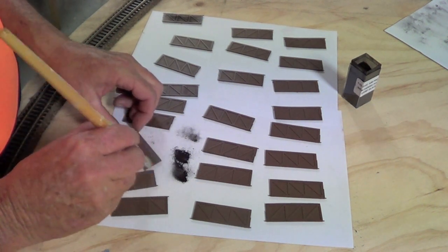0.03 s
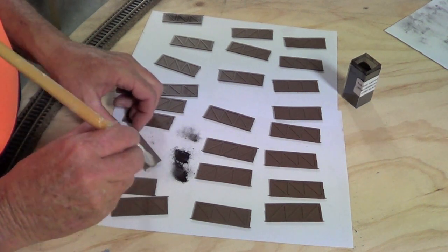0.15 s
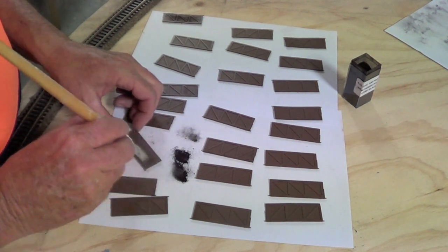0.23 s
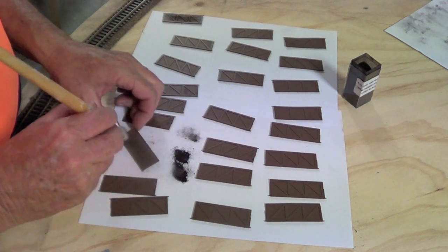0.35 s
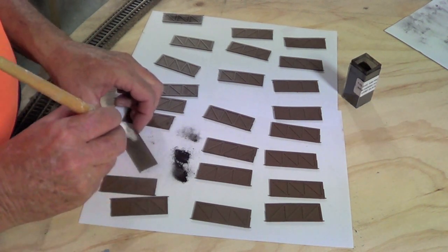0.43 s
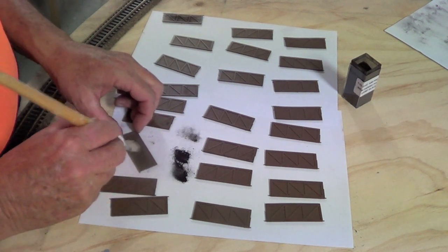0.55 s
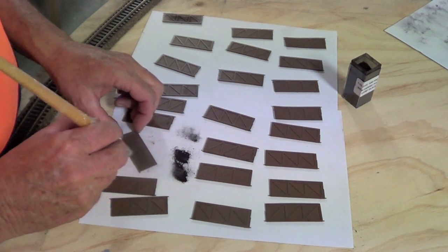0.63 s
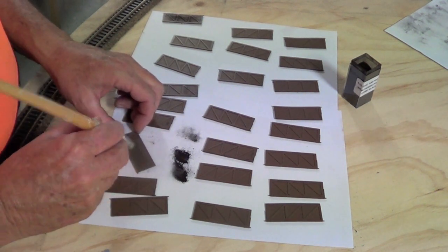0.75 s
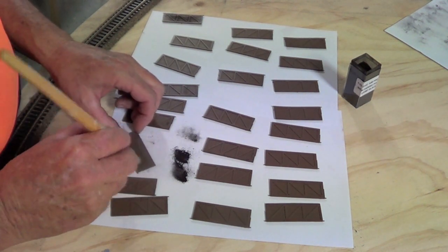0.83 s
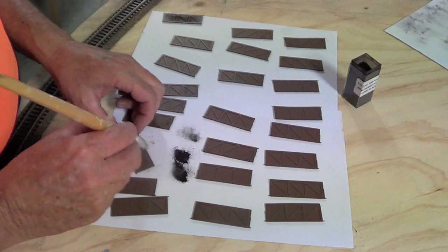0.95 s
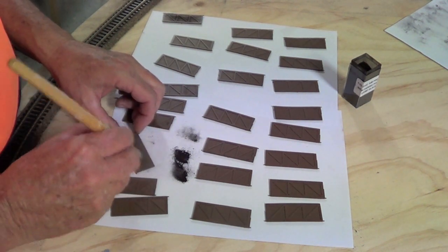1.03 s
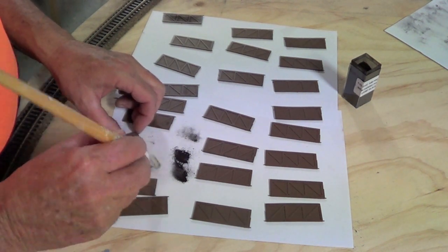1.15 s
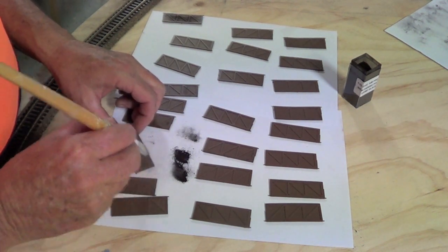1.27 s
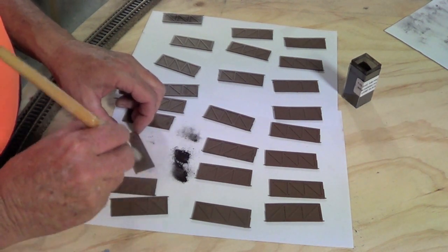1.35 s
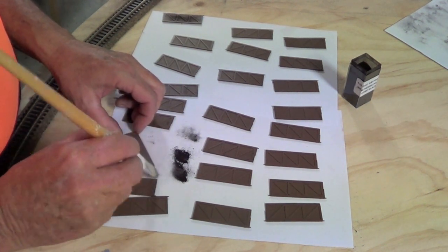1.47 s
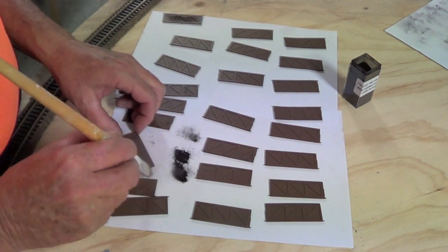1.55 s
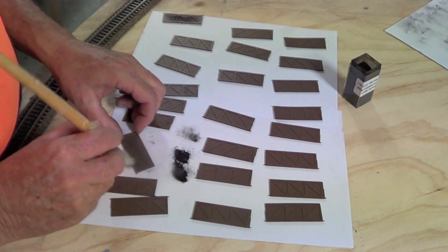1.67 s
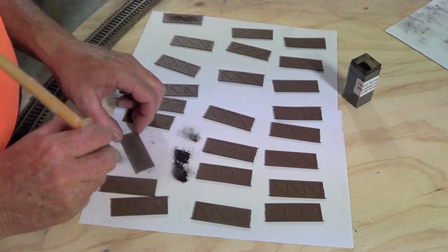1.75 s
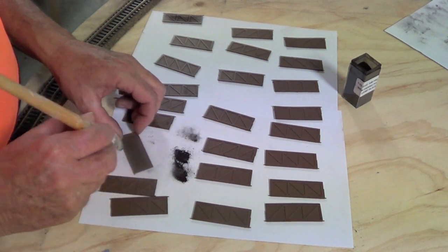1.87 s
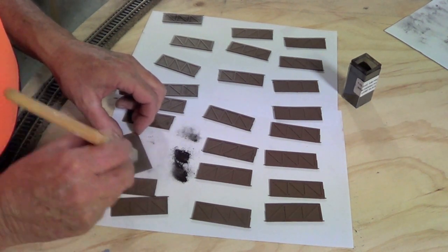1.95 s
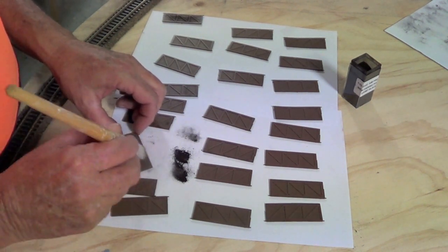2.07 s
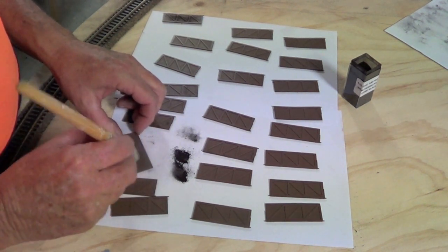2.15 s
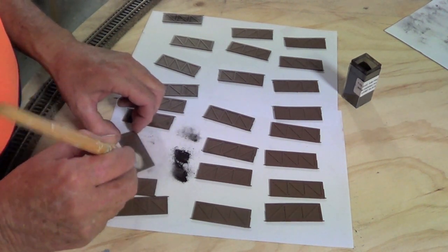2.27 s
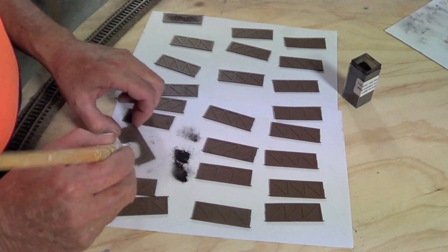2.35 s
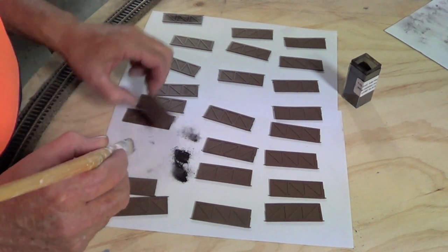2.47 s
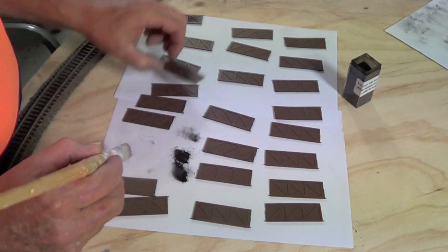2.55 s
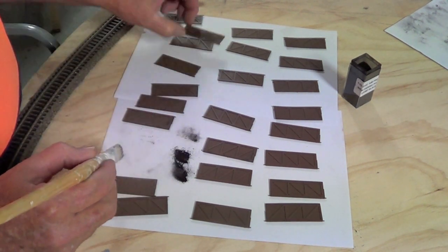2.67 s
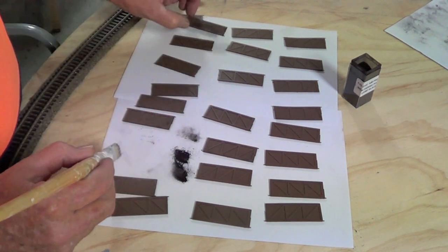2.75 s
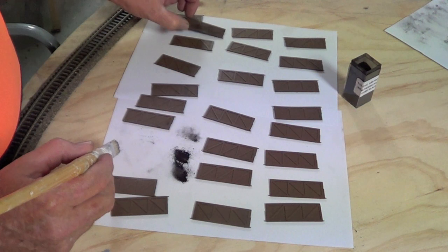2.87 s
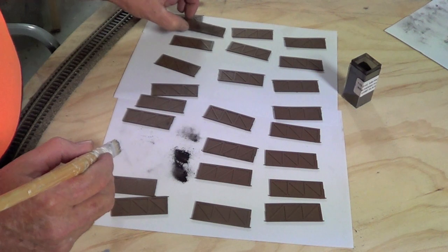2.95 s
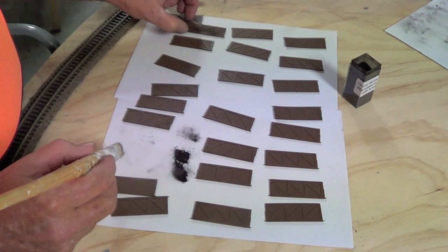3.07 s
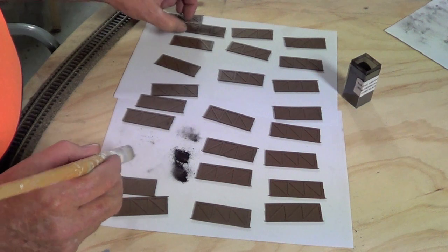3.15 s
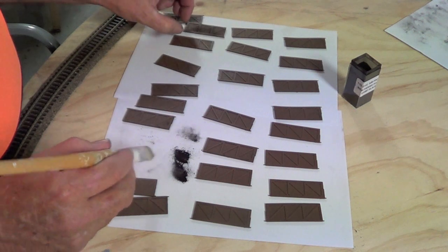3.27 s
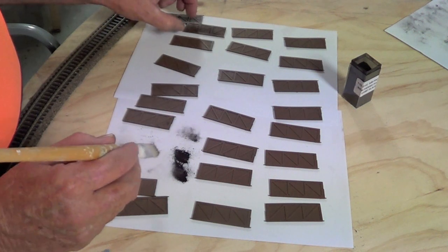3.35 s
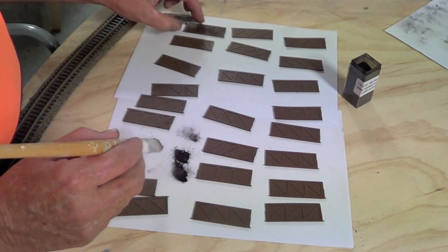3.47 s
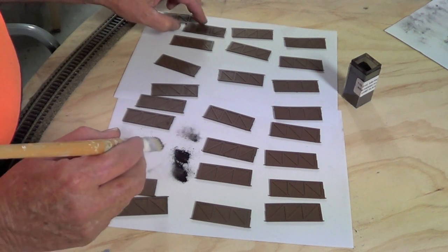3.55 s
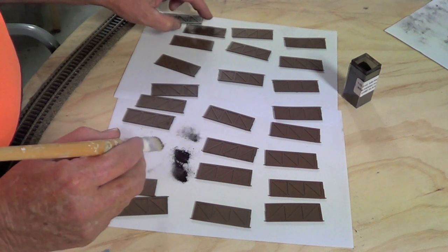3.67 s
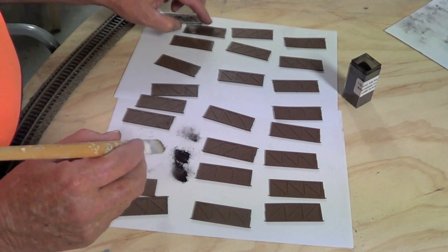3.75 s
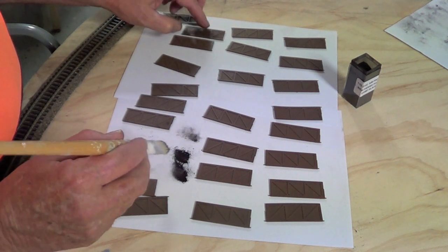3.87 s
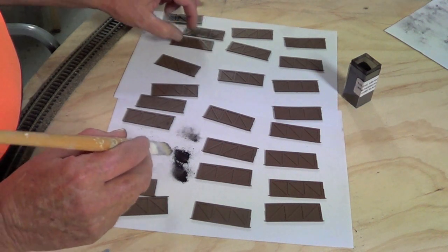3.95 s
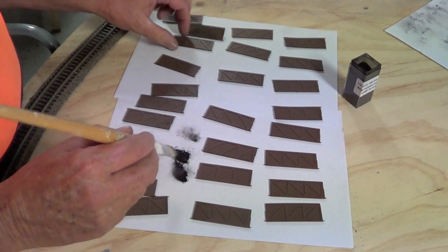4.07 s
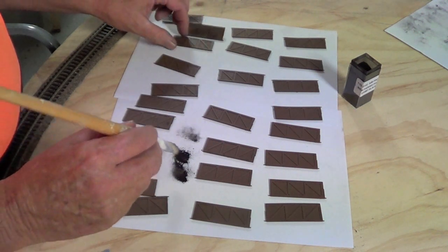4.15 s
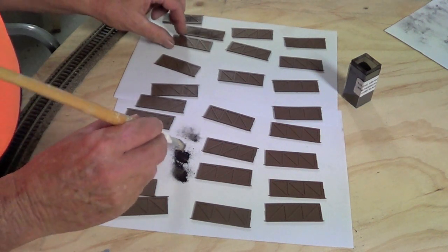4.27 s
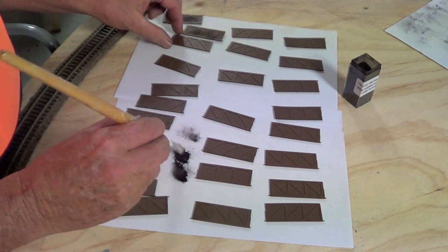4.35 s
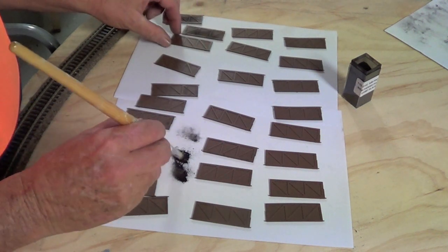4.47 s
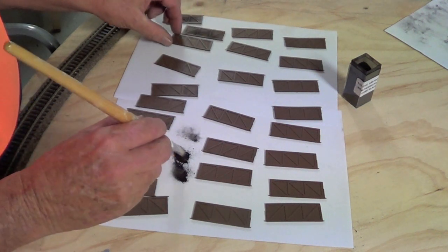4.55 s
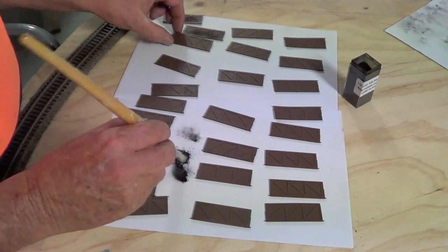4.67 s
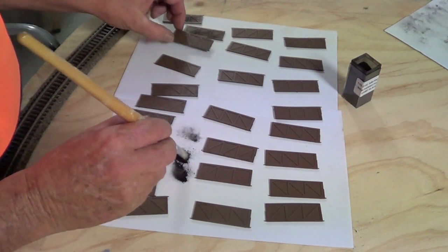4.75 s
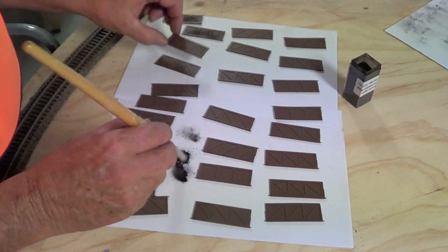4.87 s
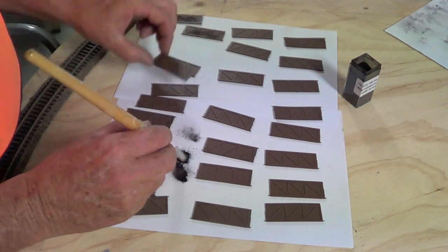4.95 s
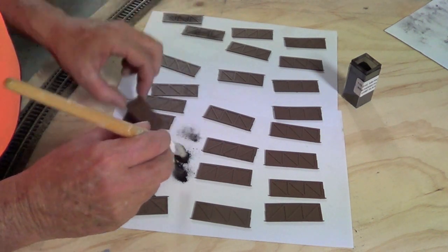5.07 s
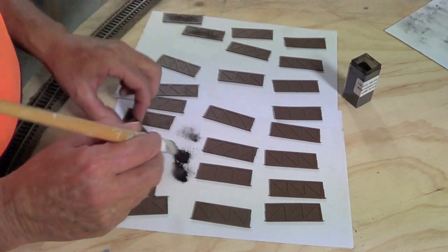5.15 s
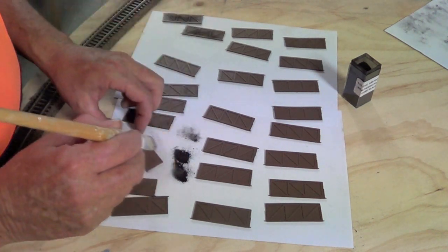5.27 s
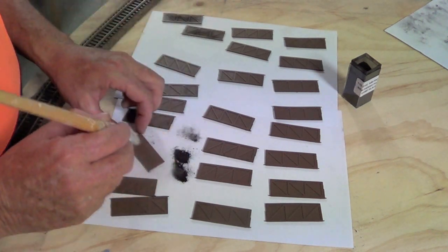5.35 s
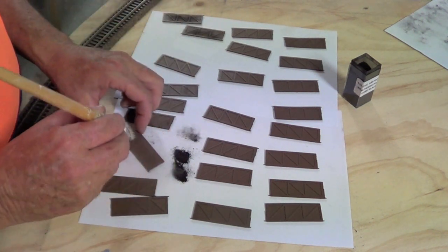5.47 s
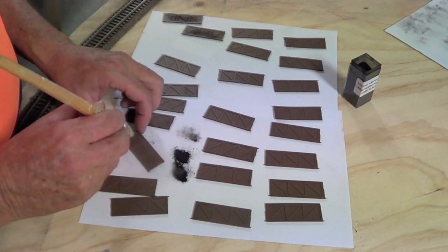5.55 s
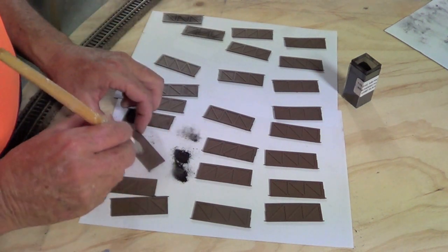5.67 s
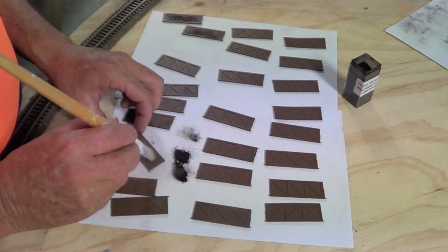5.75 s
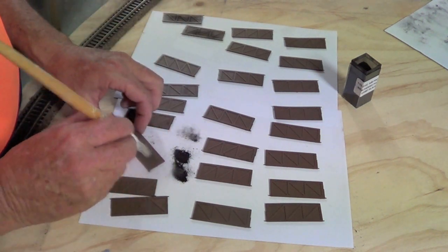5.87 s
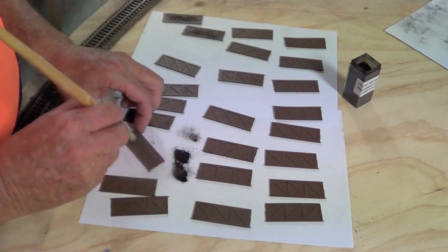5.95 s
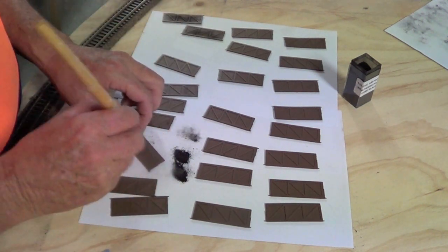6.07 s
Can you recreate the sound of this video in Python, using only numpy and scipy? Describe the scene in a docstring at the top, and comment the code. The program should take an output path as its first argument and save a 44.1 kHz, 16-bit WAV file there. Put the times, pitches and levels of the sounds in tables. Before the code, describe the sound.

A small stiff brush scrubs plastic tiles in short bright strokes, a tile clatters down, then light paper dabs and bench knocks over soft hum.

```python
"""A small stiff brush scrubs powder over plastic tiles on a paper-covered workbench, close to a camera's
microphone pair. Its bristles are random slips that shake short fizzes of noise, shaped into landings, pulls and dabs.
A tile clatters down and the bench is knocked: rough or rounded pushes ring decaying modes.
Behind lie the room's soft hum of slow noise and a tone, a rush of air as coloured noise, and
the camera's own motor, a treble whine of sine lines a shaft rate apart."""
import sys
import numpy as np
from scipy import signal
from scipy.fft import rfft, irfft
from scipy.io import wavfile
from scipy.ndimage import uniform_filter1d

SR = 44100
rng = np.random.default_rng(int(sys.argv[2]) if len(sys.argv) > 2 else 0)


def digitize_waveform(pressure):
    """Quantize a signal to 16-bit integers and store it at the path in sys.argv[1].

    Rows of a 2-D input are taken as channels; values are limited to [-1, 1].
    """
    field = np.atleast_2d(pressure).T
    bounded = np.clip(field, -1, 1)
    quanta = np.round(bounded * 32767).astype(np.int16)
    wavfile.write(sys.argv[1], SR, quanta)


def gain_from_decibels(decibels):
    """Convert decibel values to linear amplitude factors."""
    exponent = np.asarray(decibels, float) / 20
    return 10 ** exponent


N = 269451
T = np.arange(N) / SR

# motor housing resonances:
# (centre [Hz], half width to -6 dB [Hz], relative level [dB], odd shaft multiples re even [dB])
HOUSING_MODES = [(3350, 90, -80, 0), (3650, 120, -78, -8), (4055, 95, -65.5, -3), (4380, 230, -75, -1),
                 (4720, 120, -69, -5), (5120, 170, -75, 0), (5300, 40, -64, -8), (5428, 55, -68, 0),
                 (5850, 90, -79, 0), (8370, 70, -79, 0), (8590, 85, -70, -2), (8870, 100, -80, 0),
                 (9255, 105, -65.5, -2.5), (9460, 150, -75, -1), (10400, 90, -81, 0)]
# housing resonances struck once a shaft turn:
# (from [Hz], to [Hz], time into the turn [s], lag of the odd lines [cycles])
HOUSING_STRIKES = [(3900, 4300, .0015, .25), (5000, 6000, .0055, .15), (8300, 8950, .0128, 0),
                   (8950, 9800, .0142, .08)]
SHAFT_HZ, WHINE_DB = 50, 0.5
# bands of bass hum from distant machines: (centre [Hz], rms level [dB], width [Hz])
HUM_BANDS = [(101.1, -61, 20.6), (54.9, -63.5, 22), (162.6, -66.5, 28.4)]
TONE_HZ, TONE_DB = 285.3, -60.5
# spectrum of the air rush: (frequency [Hz], relative density [dB])
AIR_SPECTRUM = [(13, -44), (22, -10), (87, -0.5), (233, -6.5), (283, -8), (352, -12.5), (947, -9.5),
                (3170, -18), (3950, -19), (4920, -16), (5340, -15), (6300, -19.5), (9260, -18.5),
                (10100, -19), (15600, -22)]
# swell of the low part of the rush: (time [s], relative level [dB])
RUSH_SWELL = [(0, 7.5), (.5, 7), (1, 6.5), (1.5, 7.5), (2.2, 6), (3, 4.5), (4, 5.5), (5, 5.5), (6.11, 4.5)]
# stereo width of the rush: (frequency [Hz], side re mid [dB])
AIR_WIDTH = [(60, -33), (110, -24.5), (200, -14.5), (380, -4), (700, -5), (1290, -4.5), (2380, -3.5),
             (4400, 4), (8120, -13.5), (15000, -37)]
AIR_DB, RUSH_TOP_HZ, HISS_DB = -51, 2440, -76
# colour of the scrubbing bristles: (frequency [Hz], relative gain [dB])
BRISTLE_COLOUR = [(1760, -46.5), (3000, -17.5), (3640, -11), (4240, -17.5), (4800, -8.5), (5320, -1),
                  (6320, -2.5), (7200, -0.5), (8100, -9), (8920, -0.5), (10900, -2.5), (12900, -13.5),
                  (15600, -11.5)]
# the brush lands on the tile and the bristles splay:
# (time [s], length [s], relative level [dB], scrape re main [dB], sheen re main [dB])
BRUSH_LANDINGS = [(0.065, 0.014, -38.5, -0.5, -13), (0.615, 0.019, -40.5, -9, -12),
                  (0.858, 0.015, -38.5, -3, -10), (1.11, 0.016, -38.5, -6, -13),
                  (1.453, 0.0065, -35, -2.5, -12), (1.763, .022, -39.5, -6, -8),
                  (2.039, .012, -45.5, -13, -15), (2.253, 0.012, -42.5, -1, -10),
                  (5.97, 0.018, -40.5, -6.5, -12)]
# the brush is pulled along the tile and lifted:
# (start [s], lift [s], relative level at the lift [dB], swell on the way [dB], sheen re main at the lift [dB])
BRUSH_PULLS = [(0.109, .175, -38.5, 3, -7), (0.307, 0.396, -33, 11, -11), (0.64, 0.718, -44.5, 2.5, -9),
               (0.915, 0.955, -43.5, -7.5, -9), (1.143, 1.191, -38.5, 3, -4), (1.499, 1.545, -40, 0.5, -6),
               (1.793, 1.803, -42, -4, -7), (1.834, 1.842, -37, 6.5, -3), (2.074, 2.122, -46.5, -4, -7),
               (2.3, 2.332, -46, -2.5, -7), (5.749, 5.803, -39.5, 7.5, -10), (6.002, 6.058, -41, -2.5, -8)]
LAND_DB_PER_S, SPLAY_DB_PER_S = 2500., 900.  # rise and fall of a landing
GRIP_DB_PER_S, LIFT_DB_PER_S = 508, 527  # rise and fall of a pull
PULL_SCRAPE_DB, LIFT_SCRAPE_DB_PER_S = -4, 105  # the scrape outlasts the lift
PULL_SHEEN_DB_PER_S = 66  # a pull brightens on its way to the lift
SPLIT_HZ, SHEEN_HZ = 8200, 11800
FLICKER_DB = 1.3  # spread of the separate wavering of the two lower bristle bands
# bristle tufts snapping over an edge: (time [s], strength [dB], bright part re dark part [dB])
TUFT_SNAPS = [(0.0726, -33, -15), (0.2823, -46, 3), (0.3057, -40, 9), (0.3414, -41, -4), (0.3495, -31, 3),
              (0.3535, -36, -6), (0.362, -36, 0), (0.366, -39, -3), (0.382, -31, -7), (0.3935, -30, -2),
              (0.4054, -35, -3), (0.6367, -33, 7), (1.1824, -32, 1), (1.4975, -32, -5), (1.544, -38, 4),
              (1.7714, -40, 9), (2.037, -41, 5), (2.0771, -32, -11), (2.0847, -34, 6), (2.255, -36, -10),
              (2.268, -34, -7), (3.5154, -44, -12), (3.5967, -41, -15), (3.6575, -42, 3), (3.6717, -44, 0),
              (3.7289, -45, 0), (4.136, -39, 2), (4.4967, -40, 1), (4.7711, -44, 3), (4.9811, -36, 3),
              (5.9688, -40, -5)]
FIZZ_DECAY_S = 0.0011  # shared by snaps and ticks
# light touches and slides on the paper:
# (start [s], end [s], relative level at the end [dB], swell on the way [dB])
PAPER_DABS = [(2.965, 2.985, -58.5, 3), (3.01, 3.03, -62, -4), (3.67, 3.71, -65, -8),
              (3.873, 3.925, -59.5, -6.5), (4.13, 4.2, -62.5, -5), (4.314, 4.43, -61.5, -5),
              (4.47, 4.507, -50.5, 8), (4.547, 4.624, -61.5, -14), (4.769, 4.77, -44.5, 11),
              (4.79, 4.833, -60, 6), (4.986, 4.987, -43, 4), (5.034, 5.053, -54, -3),
              (5.343, 5.352, -57.5, 0)]
TOUCH_DB_PER_S, LEAVE_DB_PER_S = 900., 600.  # rise and fall of a dab
DAB_SHEEN_DB, DAB_SCRAPE_DB = -9, -2
# the tile lands, bounces and rattles to rest: (time [s], strength [dB], contact decay [s])
TILE_BLOWS = [(3.1375, -43, .001), (3.1456, -22.5, 0.0015), (3.1505, -22, 0.0041), (3.153, -18.5, 0.0025),
              (3.1605, -25.5, 0.002), (3.166, -23, 0.045), (3.182, -38, 0.0055)]
# modes of the small tile: (frequency [Hz], relative level [dB], t60 [s])
TILE_MODES = [(3554, -5, 0.019), (4980, -6, .01), (5330, -7, 0.022), (6400, -4, .012), (6790, -7, 0.036),
              (7180, -8, .015), (8780, -2, 0.0079), (9940, 2.5, 0.011), (10450, -3.5, .006),
              (11200, -6, .01), (13400, -4, .005), (14800, -10, .004)]
# knocks on the bench top: (time [s], push strength [dB], contact [s], tick strength [dB])
BENCH_KNOCKS = [(4.135, -41, 0.0012, -60), (4.3139, -32, 0.00052, -17.5), (4.5389, -30.5, 0.00011, -20)]
# modes of the bench top: (frequency [Hz], relative level [dB], t60 [s])
BENCH_MODES = [(349, 1.5, 0.07), (407, 11, 0.016), (499, -3.5, 0.087), (642, 3, 0.024), (803, 7, 0.022),
               (910, 5, 0.016), (1040, 0.5, 0.028), (1180, 4.5, 0.021), (1560, 3, 0.011), (1677, -1, 0.033),
               (2080, 0.5, 0.008), (2940, -8, 0.0048)]
REBOUND_S, REBOUND_DB = .009, -14.5
# stereo width of the room tail: (frequency [Hz], side filter gain [dB])
ROOM_WIDTH = [(200, -20), (800, -12), (3000, -8), (6000, -50), (12000, -50)]
ROOM_T60_S, ROOM_TREBLE_T60_S, ROOM_SPLIT_HZ = 0.61, 0.41, 1560
TOP_HZ = 15900


def level(x, db):
    """Scale to an rms level."""
    return x * gain_from_decibels(db) / np.sqrt(np.mean(x ** 2))


def along(points, hz):
    """Read (frequency [Hz], value) points on a log-frequency axis."""
    f, v = np.transpose(points)
    return np.interp(np.log(hz + 1), np.log(f), v)


def colour(x, points):
    """Causal filter with the given (frequency [Hz], gain [dB]), from the cepstrum."""
    cepstrum = irfft(np.log(gain_from_decibels(along(points, np.arange(1025) * SR / 2048))))
    # folding onto positive times gives minimum phase
    cepstrum[1:1024] *= 2
    cepstrum[1025:] = 0
    response = irfft(np.exp(rfft(cepstrum)))
    return signal.fftconvolve(x, response)[:N]


def band(x, lo_hz, hi_hz):
    """Steep band-pass."""
    sos = signal.butter(3, [lo_hz, min(hi_hz, .45 * SR)], "band", fs=SR, output="sos")
    return signal.sosfilt(sos, x)


def walk(rate):
    """Random levels held 1 / rate s and slewed twice; spread 1."""
    k = int(SR / rate)
    held = np.repeat(rng.standard_normal(N // k + 1), k)
    w = uniform_filter1d(uniform_filter1d(held, k), k)[:N]
    return w / w.std()


def crackle(per_s, spread_db, smear_s, hiss):
    """Bristle tips slip one by one with uneven force; each slip fizzes briefly, over a smooth hiss."""
    chance = rng.random((2, N))
    strength = gain_from_decibels(-spread_db * np.log(chance[1] + .02))
    slips = (chance[0] < per_s / SR) * strength
    force = signal.lfilter([1], [1, -np.exp(-1 / (smear_s * SR))], slips)
    return rng.standard_normal(N) * (hiss + force / np.sqrt(np.mean(force ** 2)))


def contact(start_s, end_s, db, swell_db, rise_db_per_s, fall_db_per_s):
    """Level in dB of one contact: a rise, a steady swell while it lasts, a fall."""
    held = db - swell_db * np.clip((end_s - T) / (end_s - start_s), 0, 1)
    rise = rise_db_per_s * np.maximum(start_s - T, 0)
    fall = fall_db_per_s * np.maximum(T - end_s, 0)
    return held - rise - fall


def bursts(events):
    """A fizz of a few milliseconds at each (time [s], peak [dB])."""
    x = np.zeros(N)
    t = T[:int(.015 * SR)]
    for (s, db), noise in zip(events, rng.standard_normal((len(events), len(t)))):
        burst = noise * (1 - np.exp(-t / .00015)) * np.exp(-t / FIZZ_DECAY_S)
        x[int(s * SR):int(s * SR) + len(t)] += gain_from_decibels(db) * burst / np.abs(burst).max()
    return x


def blows(events):
    """A rough push at each time that dies away over the contact time; longer ones are weaker at each instant."""
    x = np.zeros(N)
    t = T[:SR // 4]
    for (s, db, contact_s), noise in zip(events, rng.standard_normal((len(events), len(t)))):
        push = noise * np.exp(-t / contact_s)
        x[int(s * SR):int(s * SR) + len(t)] += gain_from_decibels(db) * push / np.sqrt(contact_s * SR / 2)
    return x


def ring(x, modes):
    """Decaying modes of a struck body."""
    t = T[:SR // 2]
    body = np.zeros(len(t))
    for k, (hz, db, t60) in enumerate(modes):
        # neighbouring modes start in opposite sense, so the body is quiet below its lowest one
        body += (-1) ** k * gain_from_decibels(db) * np.sin(2 * np.pi * hz * t) * 1000. ** (-t / t60)
    return signal.fftconvolve(x, body / np.abs(body).max())[:N]


def whine():
    """The motor repeats one pattern every shaft turn, so its housing sings in lines a shaft rate apart."""
    k = np.arange(60, 215)
    lines = k * SHAFT_HZ
    power = np.zeros(len(k))
    for hz, half_hz, db, odd_db in HOUSING_MODES:
        power += gain_from_decibels(db + odd_db * (k % 2) - 6 * ((lines - hz) / half_hz) ** 2) ** 2
    x = np.zeros(N)
    for hz, gain, chance in zip(lines, np.sqrt(power), rng.random(len(k))):
        if gain < gain_from_decibels(-88):
            continue
        turns = chance
        for lo, hi, s, lag in HOUSING_STRIKES:
            if lo <= hz < hi:
                # lines of a struck resonance add up to a burst a turn; lagging odd lines split it in two
                turns = .2 * chance - hz * s - lag * (hz // SHAFT_HZ % 2)
        x += gain * np.sin(2 * np.pi * (hz * T + turns))
    return np.sqrt(2) * gain_from_decibels(WHINE_DB) * x


def hum():
    """Distant machines: one nearly steady tone and broad wavering bands of noise in the bass."""
    phase = 2 * np.pi * np.cumsum(TONE_HZ + 0.47 * walk(5.42)) / SR
    x = level(np.sin(phase) * gain_from_decibels(1.8 * walk(4.4)), TONE_DB)
    for hz, db, width_hz in HUM_BANDS:
        noise = rng.standard_normal(N)
        x = x + level(band(noise, hz - width_hz / 2, hz + width_hz / 2), db)
    return x


def air():
    """Ventilation rush: coloured noise that swells in its low part, steady above, widest in the middle range."""
    hz = np.arange(N // 2 + 1) * SR / N
    mid, side = rfft(rng.standard_normal((2, N))) * gain_from_decibels(along(AIR_SPECTRUM, hz))
    side = side * gain_from_decibels(along(AIR_WIDTH, hz))
    both = np.array([mid + side, mid - side])
    low = 1 / (1 + (hz / RUSH_TOP_HZ) ** 4)
    swell = gain_from_decibels(np.interp(T, *np.transpose(RUSH_SWELL)) + .5 * walk(2.08))
    rush = irfft(both * low, N) * swell
    steady = irfft(both * (1 - low), N)
    return level(rush + steady, AIR_DB)


def microphone_hiss():
    """Steady white noise, alike in both microphones."""
    return level(rng.standard_normal(N), HISS_DB)


def strokes():
    """Gain of the bristle band, the sheen above it and the scrape below it over all landings and pulls."""
    power = np.zeros((3, N))
    for s, length_s, db, scrape_db, sheen_db in BRUSH_LANDINGS:
        main = contact(s, s + length_s, db, 0, LAND_DB_PER_S, SPLAY_DB_PER_S)
        power += gain_from_decibels([main, main + sheen_db, main + scrape_db]) ** 2
    for start_s, lift_s, db, swell_db, sheen_db in BRUSH_PULLS:
        main = contact(start_s, lift_s, db, swell_db, GRIP_DB_PER_S, LIFT_DB_PER_S)
        sheen = sheen_db - PULL_SHEEN_DB_PER_S * np.clip(lift_s - T, 0, lift_s - start_s)
        scrape = PULL_SCRAPE_DB + LIFT_SCRAPE_DB_PER_S * np.clip(T - lift_s, 0, .1)
        power += gain_from_decibels([main, main + sheen, main + scrape]) ** 2
    return np.sqrt(power)


def brush():
    """Scrubbing: dense crackle in the colour of the bristles, pulsing as tufts cross the tile's relief."""
    force = crackle(per_s=1100., spread_db=2.4, smear_s=0.00053, hiss=1.3) * gain_from_decibels(1.1 * walk(90.))
    x = colour(force, BRISTLE_COLOUR)
    main_gain, sheen_gain, scrape_gain = strokes()
    # the tile drones under the hand and swells less than the bristles
    drone = level(band(force, 820, 2930), -31.0) * scrape_gain ** 0.55
    main = main_gain * level(band(x, SPLIT_HZ, SHEEN_HZ), 0.8) * gain_from_decibels(FLICKER_DB * walk(80.))
    sheen = sheen_gain * level(band(x, SHEEN_HZ, SR / 2), .1)
    scrape = scrape_gain * level(band(x, 3090, SPLIT_HZ), 0.85) * gain_from_decibels(FLICKER_DB * walk(80.))
    return main + sheen + scrape + drone


def snaps():
    """Each snapping tuft is a short burst, darker or brighter by its own tilt."""
    dark = bursts([(s, db) for s, db, _ in TUFT_SNAPS])
    bright = bursts([(s, db + bright_db) for s, db, bright_db in TUFT_SNAPS])
    return gain_from_decibels(7.5) * band(dark, 3450, 8000) + gain_from_decibels(8.5) * band(bright, 7400, 12600)


def dabs():
    """Light contact on paper: a finer, thinner hiss of many small slips."""
    x = crackle(per_s=3000.0, spread_db=5.0, smear_s=0.00076, hiss=0.99) * gain_from_decibels(1.1 * walk(60.))
    gain = np.sqrt(sum(gain_from_decibels(contact(*row, TOUCH_DB_PER_S, LEAVE_DB_PER_S)) ** 2 for row in PAPER_DABS))
    main = level(band(x, SPLIT_HZ, SHEEN_HZ), 1.3)
    sheen = level(band(x, SHEEN_HZ, SR / 2), DAB_SHEEN_DB)
    scrape = level(band(x, 4350, SPLIT_HZ), DAB_SCRAPE_DB)
    return gain * (main + sheen + scrape)


def clatter():
    """The small tile radiates little below its first mode; a long rattle is softer, so duller, than a tap."""
    taps = blows([row for row in TILE_BLOWS if row[2] < .004])
    rattle = band(blows([row for row in TILE_BLOWS if row[2] >= .004]), 3000, 9500)
    x = ring(taps + rattle, TILE_MODES)
    return band(band(x, 3200, 17000), 3200, 17000)  # twice, for steeper edges


def knocks():
    """A rounded push rings the bench top; the shorter the contact, the brighter the knock."""
    x = np.zeros(N)
    for s, db, contact_s, _ in BENCH_KNOCKS:
        push = np.sin(np.pi * np.clip(T[:100] / contact_s, 0, 1))
        x[int(s * SR):int(s * SR) + 100] += gain_from_decibels(db) * push / push.sum()
    crack = gain_from_decibels(11.5) * band(x, 1000, 3600)
    rebound = gain_from_decibels(REBOUND_DB) * np.roll(x, int(REBOUND_S * SR))
    return ring(x + rebound, BENCH_MODES) + crack


def ticks():
    """The sharp contact on top of each knock, and its small rebound, as bright fizzes."""
    first = [(s, tick_db) for s, _, _, tick_db in BENCH_KNOCKS]
    second = [(s + REBOUND_S, db + REBOUND_DB) for s, db in first]
    return band(bursts(first + second), 4000, 14500)


def room(x):
    """Diffuse tail whose treble dies first; the close pair of microphones hears it only partly apart."""
    t = T[:SR // 2]
    noise = rng.standard_normal((2, len(t))) * (t > .003)
    lows = band(noise, 60, ROOM_SPLIT_HZ)
    tail = lows * 1000. ** (-t / ROOM_T60_S) + (noise - lows) * 1000. ** (-t / ROOM_TREBLE_T60_S)
    tail = tail / np.sqrt(np.sum(tail ** 2) / 2)
    mid, side = signal.fftconvolve(x[None], tail)[:, :N]
    side = colour(side, ROOM_WIDTH)
    return np.array([mid + side, mid - side])


def scene():
    """Hand work in front, slightly left; the bench radiates largely by way of the room."""
    hand = brush() + dabs() + snaps() + ticks() + clatter()
    bench = knocks()
    # a bounce off the bench top reaches the two microphones unequally, here in opposite sense
    bounce = gain_from_decibels(-18) * np.roll(hand, int(.0012 * SR)) * np.array([[1], [-1]])
    near = hand * gain_from_decibels(np.array([[.4], [-.4]])) + bounce + gain_from_decibels(1.0) * bench
    wet = gain_from_decibels(-11.0) * hand + gain_from_decibels(4.5) * bench
    return near + room(wet) + whine() + hum() + air() + microphone_hiss()


def top_cut(x):
    """Nothing passes above the cut-off."""
    return signal.sosfilt(signal.butter(12, 16630, fs=SR, output="sos"), x)


def record(dry):
    """A steep low-pass ends the treble just below 16 kHz."""
    low_pass = signal.ellip(8, .2, 45, TOP_HZ, fs=SR, output="sos")
    mix = signal.sosfilt(low_pass, dry)
    return top_cut(mix)


dry = scene()
out = record(dry)
digitize_waveform(out)
```